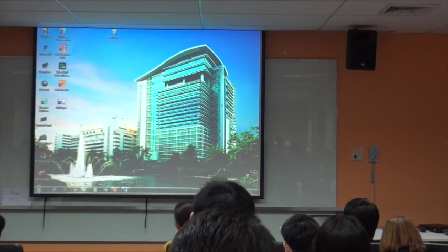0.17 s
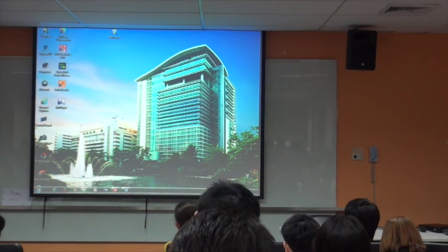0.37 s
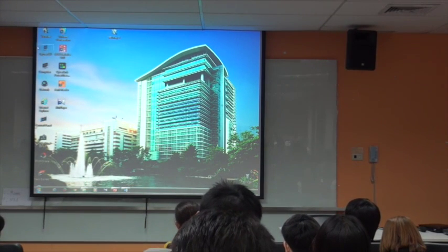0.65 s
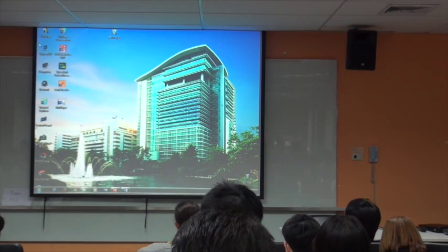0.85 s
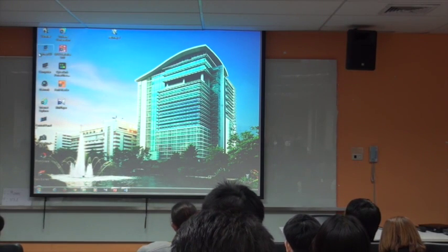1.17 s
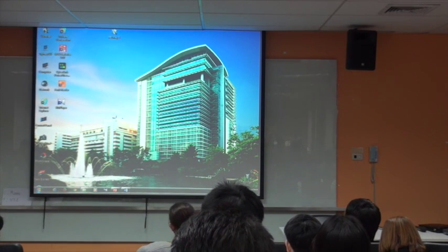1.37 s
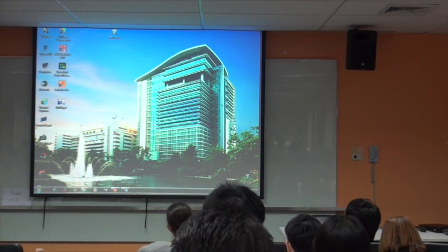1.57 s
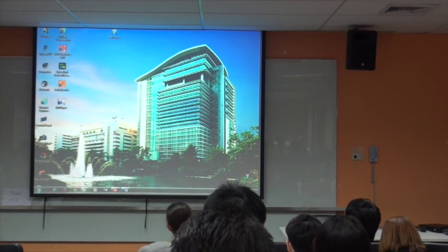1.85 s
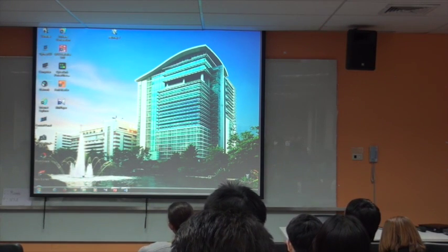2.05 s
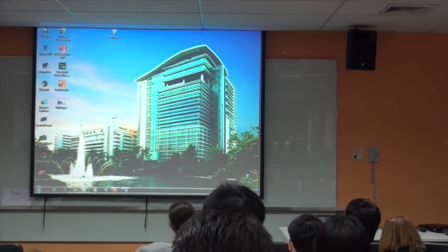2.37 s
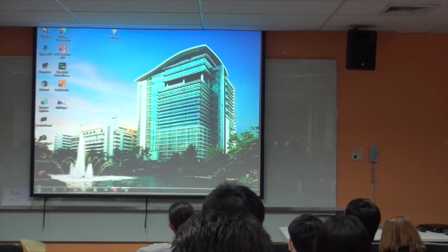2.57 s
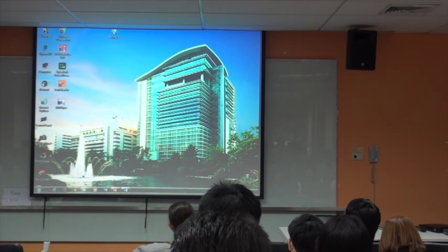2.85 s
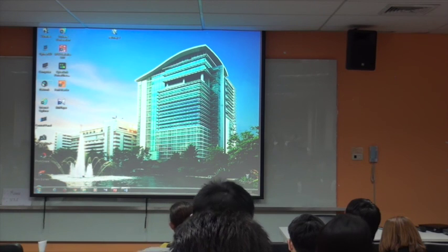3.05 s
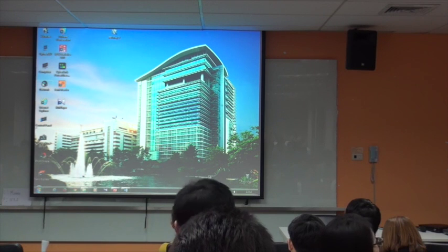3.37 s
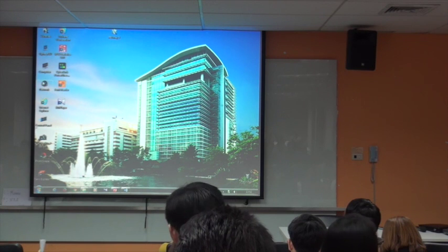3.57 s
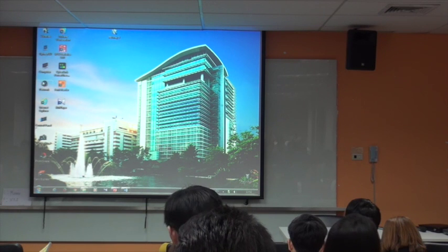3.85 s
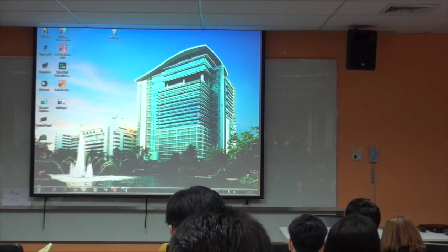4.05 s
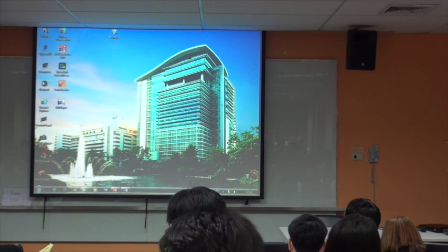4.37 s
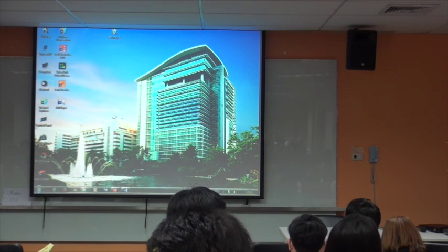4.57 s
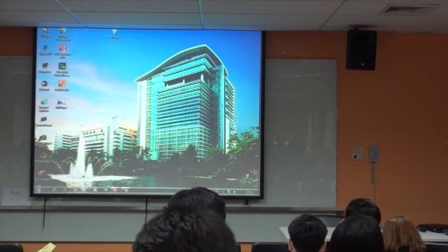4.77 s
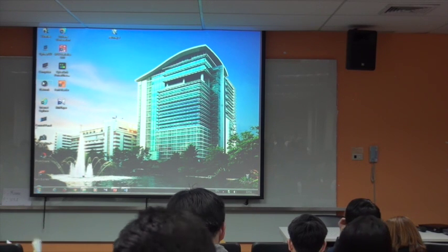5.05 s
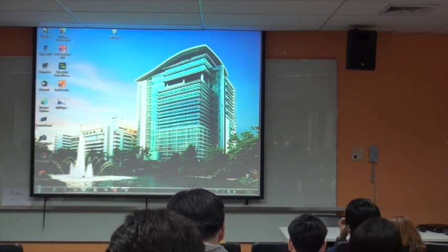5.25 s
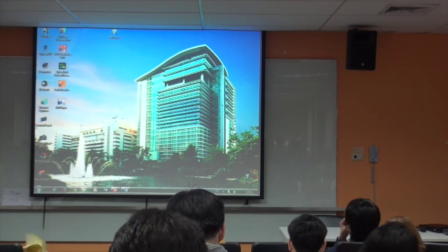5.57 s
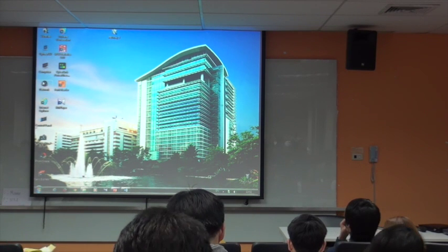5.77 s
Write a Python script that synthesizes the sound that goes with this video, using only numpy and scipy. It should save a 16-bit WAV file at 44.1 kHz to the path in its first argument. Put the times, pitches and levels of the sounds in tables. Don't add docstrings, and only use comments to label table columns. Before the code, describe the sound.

A steady low electrical buzz, rich in harmonics and topped with thin high sizzle, runs throughout, with soft hiss, ventilation rumble and a faint wavering whine. Small dry plastic clicks occur just before three seconds; a louder cluster near five leads into brief paper rustling. Close seat noises stand out against the centred buzz, which grows gradually louder as automatic gain rises.

```python
import sys
import numpy as np
from scipy import signal
from scipy.fft import rfft, irfft
from scipy.io import wavfile
from scipy.ndimage import uniform_filter1d, map_coordinates

SR = 44100
rng = np.random.default_rng(int(sys.argv[2]) if len(sys.argv) > 2 else 0)


def nominal_scale(level):
    x = np.asarray(level, float) / 20
    return 10 ** x


def file_out(sig):
    cols = np.atleast_2d(sig).T
    lim = np.clip(cols, -1, 1)
    pcm = np.round(lim * 32767).astype(np.int16)
    wavfile.write(sys.argv[1], SR, pcm)


N = 260693

# (t/s, f/Hz)
MAINS_DRIFT = [(0, 49.9754), (2, 49.9755), (4, 49.9768), (5.92, 49.9793)]
FIRST_FIRING_S, CONDUCTION_MS = 0.01121, 5.32
# (offset/1, power swing/1, swing lead/ms, cusp/1, cusp rise/ms,
# cusp tail/1, recovery/1, recovery time/ms)
HALF_CYCLES = [
    (0.84, 2.437, 0.64, 1.14, 0.31, 0.9, 1.415, 3.97),
    (0.33, 2.545, 0.31, 1.59, 0.29, 0.14, 1.45, 4.4),
]
# (f/Hz, width/Hz, rising level/dB, falling level/dB)
WIRING_MODES = [(11580, 710, -28, -10.5), (12200, 3600, -6.5, -19), (14500, 6600, -9, -4)]
WHINE_HZ, BEAT_HZ = 823.2, 2.6
WHINE_SIDEBANDS = [-2, -1, 0, 1, 2, 3, 5]
WHINE_LEVELS = [-37, -34, -31, -40, -42.5, -38, -43.5]
# (f/Hz, width/Hz, level/dB)
DUCT_MODES = [(131.3, 11, -28.5), (155.5, 10, -36.5), (230, 81, -35.5)]
# (f/Hz, level/dB per Hz)
HISS_SPECTRUM = [(30, -53), (80, -47.5), (200, -51.5), (380, -52), (700, -57), (2500, -59.5), (10000, -60),
                 (13500, -58.5)]
# (f/Hz, level/dB per Hz)
SIDE_SPECTRUM = [(40, -1), (150, -9), (400, -0.5), (650, -5), (1200, -25), (4500, -23.5), (9000, -19),
                 (12000, -32)]
SIDE_PATCHY_DB = 3.5
GAIN_START_DB, GAIN_CREEP_DB_PER_S = -29.5, 1.59
# (t/s, peak level/dB, f/Hz, overtone level/dB)
BUTTON_SNAPS = [(2.7905, -23, 4970, -38), (2.7905, -30, 6300, -45), (2.880, -31, 5000, -48),
                (2.906, -24, 4900, -35), (2.9145, -26, 5100, -45), (4.7625, -29, 5060, -13.5),
                (4.7627, -28, 8700, -50), (4.8599, -9.5, 4260, -15), (4.8598, -16.5, 1400, -30),
                (4.8599, -25, 5230, -23), (4.892, -24, 3570, -40), (4.927, -27, 3300, -42)]
SNAP_WIDTH_HZ, OVERTONE_RATIO, OVERTONE_WIDTH_HZ = 1500, 2.05, 2500
# (t/s, peak level/dB, f/Hz)
BARREL_TAPS = [(2.791, -32, 9000), (2.8983, -27, 4550), (2.8988, -23.5, 2800), (2.8988, -33, 1700),
               (2.9145, -36, 3100), (2.9145, -28, 1240), (3.212, -36, 4600), (3.256, -32, 4500),
               (3.261, -34, 1200), (4.898, -22, 3750), (4.8982, -23, 1780), (4.9345, -19, 5860),
               (4.9345, -28, 4170), (4.9345, -31, 2220), (3.266, -33, 4700)]
TAP_WIDTH_HZ, TAP_WIDTH_SLOPE = 330, 0.67
SCRAPE_PER_WIDTH = 9
# (t/s, held/s, drag level/dB, scratch level/dB)
PAPER_STROKES = [
    (4.855, 0.093, -38, -28),
    (5.0, 0.11, -24, -34),
    (5.12, 0.17, -21.5, -28.5),
]
STROKE_RISE_S, STROKE_FADE_DB_PER_S = 0.018, 240
TOP_HZ = 15740


def curve(table):
    return np.interp(np.arange(N) / SR, *np.transpose(table), right=table[-1][1])


def coloured(table):
    hz, db = np.transpose(table)
    log_hz = np.log(np.fft.rfftfreq(N, 1 / SR) + 1)
    shape = nominal_scale(np.interp(log_hz, np.log(hz), db))
    return irfft(rfft(rng.standard_normal(N)) * shape, N) * np.sqrt(SR / 2)


def resonate(x, hz, width):
    return signal.lfilter(*signal.iirpeak(min(hz, SR / 2.2), hz / width, SR), x)


def walk(rate):
    held = int(SR / rate)
    steps = np.repeat(rng.standard_normal(N // held + 1), held)
    level = uniform_filter1d(uniform_filter1d(steps, held), held)[:N]
    return level / level.std()


def mains_cycles():
    hz = curve(MAINS_DRIFT)
    waver = 8e-5 * walk(100)
    return np.cumsum(hz) / SR - hz[0] * FIRST_FIRING_S + waver


def half_wave(ms, offset, swing, lead, cusp, rise, tail, recovery, fall):
    after = ms - CONDUCTION_MS
    power_swing = swing * np.cos(2 * np.pi * (ms + lead) / 10)
    on = offset + power_swing + cusp * np.exp(np.minimum(after, 0) / rise)
    off = tail * np.exp(-np.maximum(after, 0) / 0.12) - recovery * np.exp(-after / fall)
    return np.where(after < 0, on, off)


def buzz(cycles, size=4096):
    ms = np.arange(size) * 10 / size
    rising, falling = HALF_CYCLES
    spectrum = rfft(np.r_[half_wave(ms, *rising), -half_wave(ms, *falling)])
    order = np.arange(len(spectrum))
    audible = (order > 0) * (order < 340)
    spectrum *= audible / (1 + 1j * order / 490.0)
    return map_coordinates(irfft(spectrum), [cycles % 1 * 2 * size], order=1, mode="grid-wrap")


def ringing(cycles):
    half = np.floor(2 * cycles)
    at = np.flatnonzero(np.diff(half)) + 1
    late = (2 * cycles[at] - half[at]) / (2 * (cycles[at] - cycles[at - 1]))
    taps = np.arange(-8, 8)[None] + late[:, None]
    kernel = np.sinc(taps) * np.cos(np.pi * taps / 18) ** 2
    places = (at[:, None] + np.floor(taps)).astype(int)
    scatter = nominal_scale(2.0 * rng.standard_normal(len(at)))
    falling = (half % 2).astype(int)
    fizz = 0.35 * np.exp(-(2 * cycles % 1) / 0.1) * rng.standard_normal(N)
    out = 0
    for hz, width, *db in WIRING_MODES:
        strength = nominal_scale(np.array(db))[falling] * (1 - 2 * falling)
        drive = np.r_[fizz * strength * np.sqrt(SR / width), np.zeros(8)]
        shock = (scatter * strength[at])[:, None] * SR / width / 2
        np.add.at(drive, places, kernel * shock)
        out = out + resonate(resonate(drive[:N], hz, width), hz, width)
    return out


def whine():
    s = np.arange(N) / SR
    hz = WHINE_HZ + 2 * MAINS_DRIFT[0][1] * np.array(WHINE_SIDEBANDS)[:, None]
    start = 2 * np.pi * rng.random(hz.shape)
    strong = np.sin(2 * np.pi * hz * s + start)
    weak = 0.34 * np.sin(2 * np.pi * ((hz - BEAT_HZ) * s + 0.38) + start)
    return nominal_scale(np.array(WHINE_LEVELS)) @ (strong + weak) * nominal_scale(1.5 * walk(3))


def ventilation():
    duct = 0
    for hz, width, db in DUCT_MODES:
        turbulence = rng.standard_normal(N)
        duct = duct + nominal_scale(db) * resonate(turbulence, hz, width) * np.sqrt(SR / width)
    hiss = coloured(HISS_SPECTRUM)
    bass = signal.lfilter(*signal.butter(2, 700, fs=SR), hiss)
    swell = nominal_scale(2 * walk(4.25))
    return duct * swell + hiss + bass * (nominal_scale(1.5 * walk(8)) - 1)


def pen():
    modes = [(t, db, hz, SNAP_WIDTH_HZ) for t, db, hz, _ in BUTTON_SNAPS]
    modes += [(t, db, hz * OVERTONE_RATIO, OVERTONE_WIDTH_HZ) for t, _, hz, db in BUTTON_SNAPS]
    modes += [(t, db, hz, TAP_WIDTH_HZ * (hz / 1000) ** TAP_WIDTH_SLOPE) for t, db, hz in BARREL_TAPS]
    out, s = np.zeros(N), np.arange(6000) / SR
    for k, (t, db, hz, width) in enumerate(modes):
        scrape = nominal_scale(-60 * s * width / SCRAPE_PER_WIDTH)
        tail = nominal_scale(-12.5 - 60 * s / 0.23)
        snap = rng.standard_normal(len(s)) * (scrape + tail)
        snap[0] = 20 * (-1) ** k
        click = resonate(resonate(snap, hz, width), hz, width)
        start = int(t * SR)
        out[start:start + len(s)] += click * nominal_scale(db) / np.abs(click).max()
    return out


def paper():
    grains = rng.standard_normal(N) * nominal_scale(2 * walk(90))
    drag = resonate(resonate(grains, 1750, 900), 1600, 1800)
    scratch = resonate(resonate(grains, 3600, 2600), 4200, 3600)
    s, out = np.arange(N) / SR, 0
    for start, held, drag_db, scratch_db in PAPER_STROKES:
        rise = np.clip((s - start) / STROKE_RISE_S, 0, 1)
        fade = nominal_scale(-STROKE_FADE_DB_PER_S * np.maximum(s - start - held, 0))
        out = out + rise * fade * (nominal_scale(drag_db) * drag + nominal_scale(scratch_db) * scratch)
    return 4 * out


def scene():
    cycles = mains_cycles()
    line = buzz(cycles) + ringing(cycles) + whine() + ventilation() + paper()
    side = coloured(SIDE_SPECTRUM) * nominal_scale(-62.0 + SIDE_PATCHY_DB * walk(3.04))
    side = side - resonate(line, 580, 450) * nominal_scale(-42.0) - line * nominal_scale(-55.5)
    gain = nominal_scale(GAIN_START_DB + GAIN_CREEP_DB_PER_S * np.arange(N) / SR)
    return gain * (line + side * np.array([[1], [-1]])) + pen()


def band_limit(x):
    return signal.sosfilt(signal.butter(12, 16780, fs=SR, output="sos"), x)


def record(dry):
    below_top = np.fft.rfftfreq(N, 1 / SR) < TOP_HZ
    mix = irfft(rfft(dry) * below_top, N)
    return band_limit(mix)


dry = scene()
out = record(dry)
file_out(out)
```